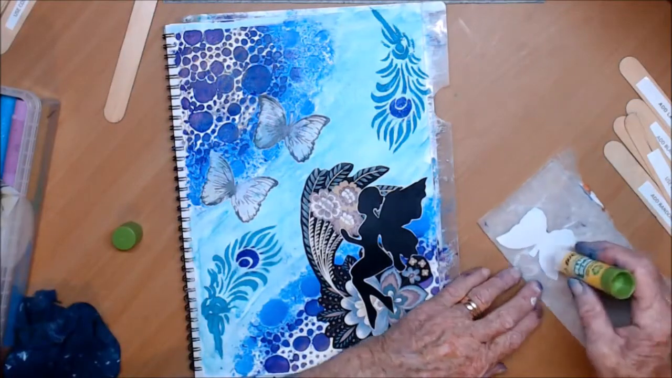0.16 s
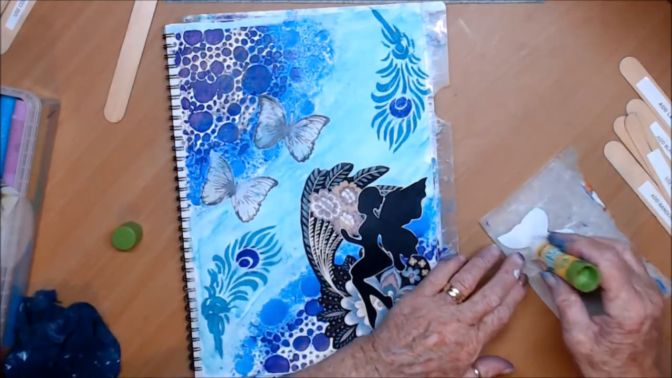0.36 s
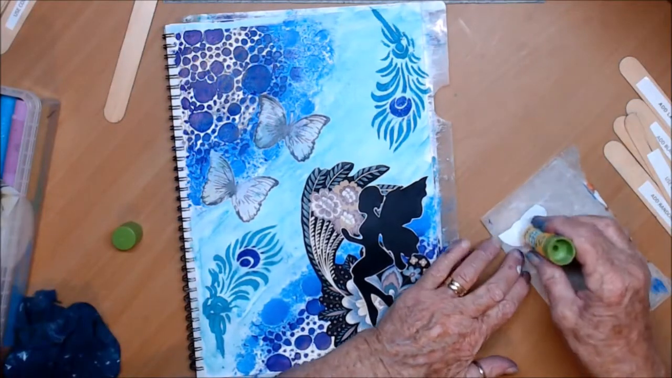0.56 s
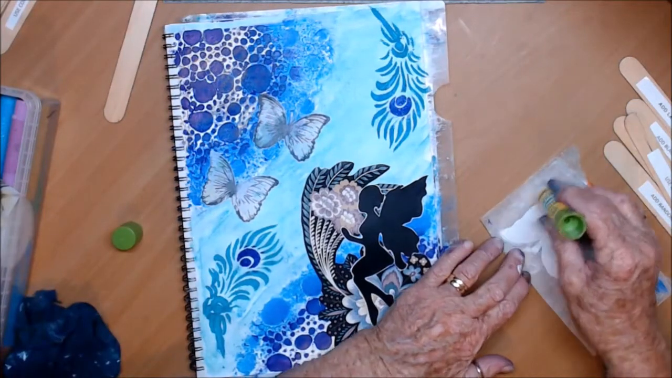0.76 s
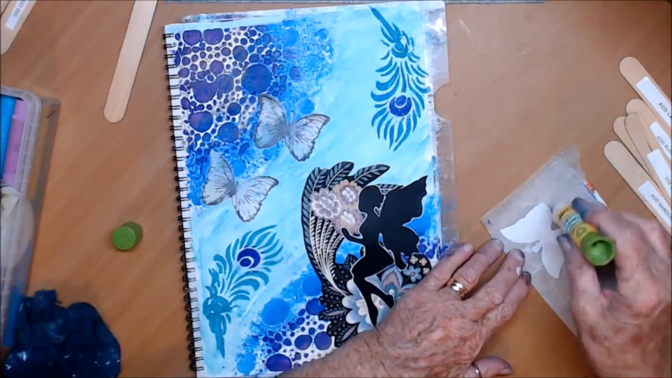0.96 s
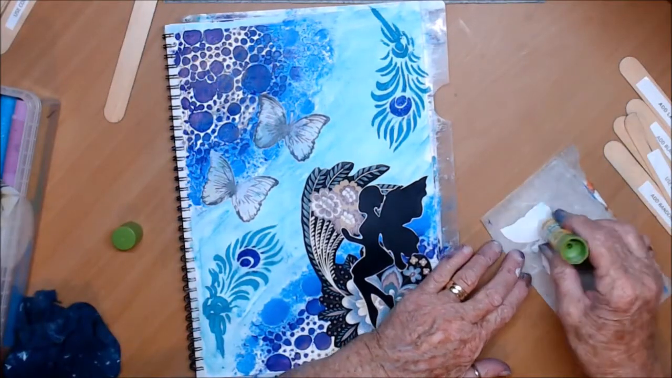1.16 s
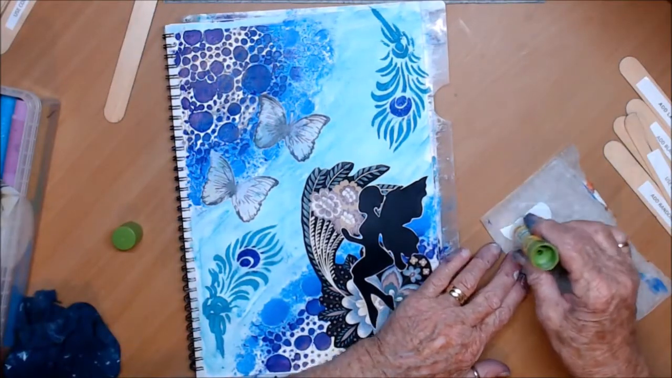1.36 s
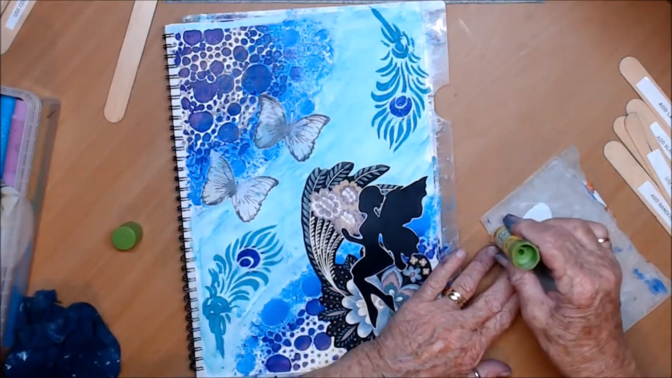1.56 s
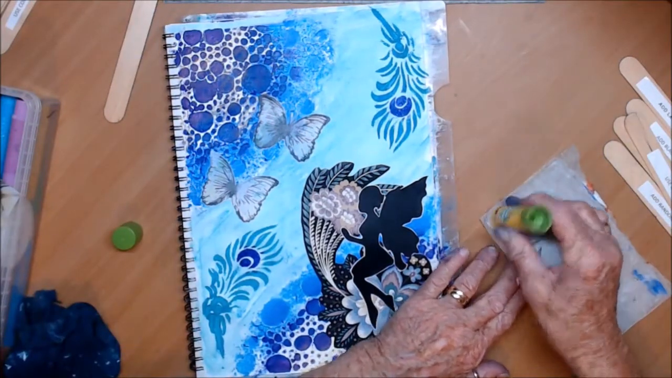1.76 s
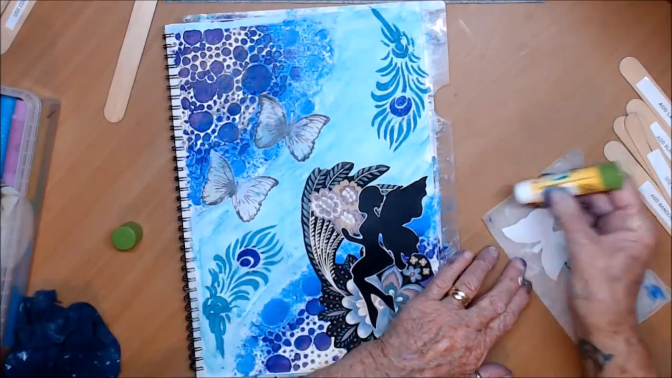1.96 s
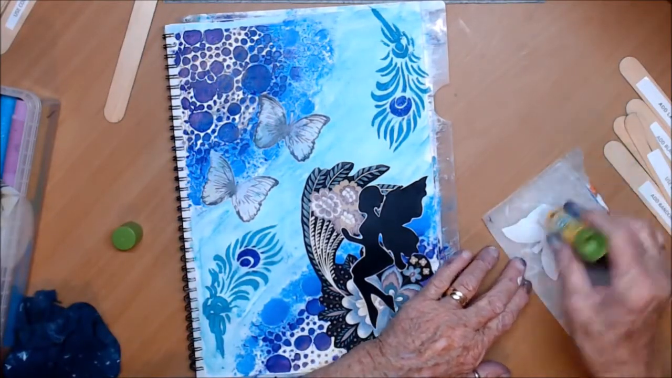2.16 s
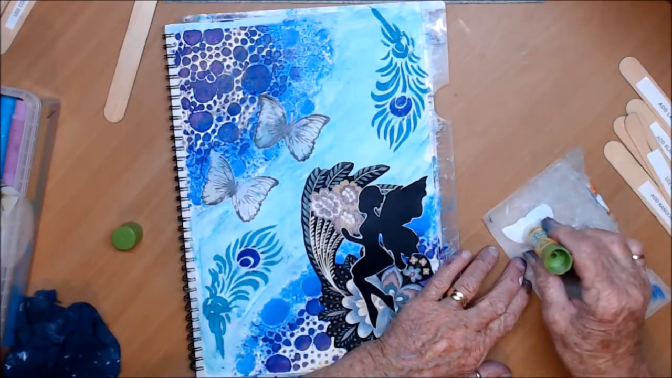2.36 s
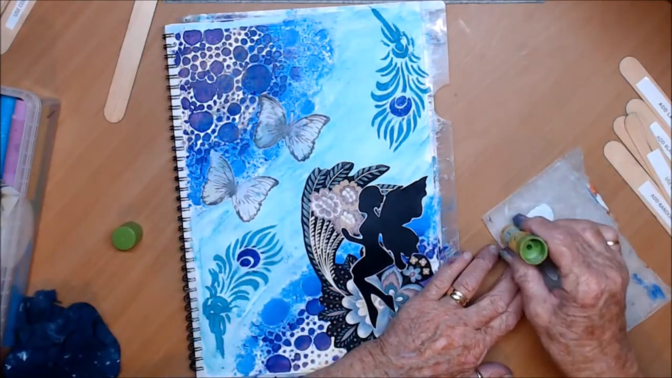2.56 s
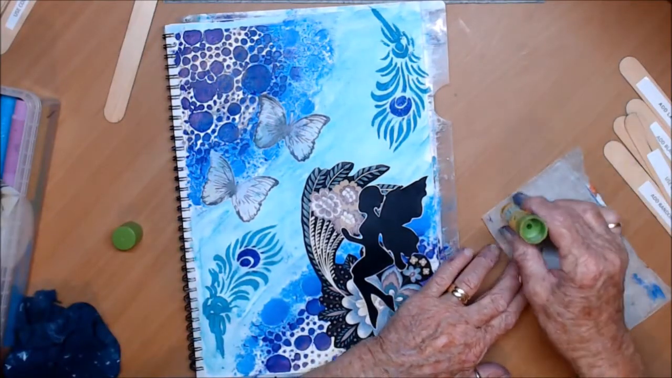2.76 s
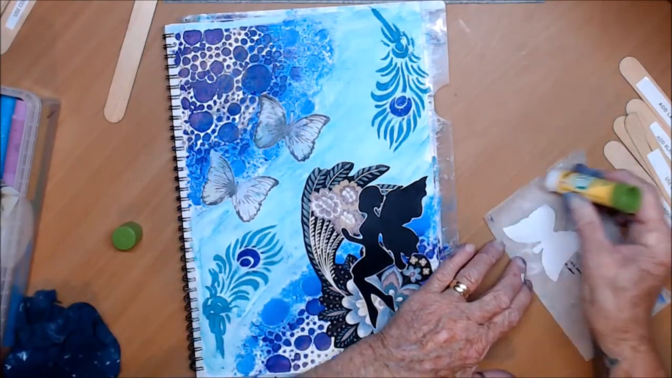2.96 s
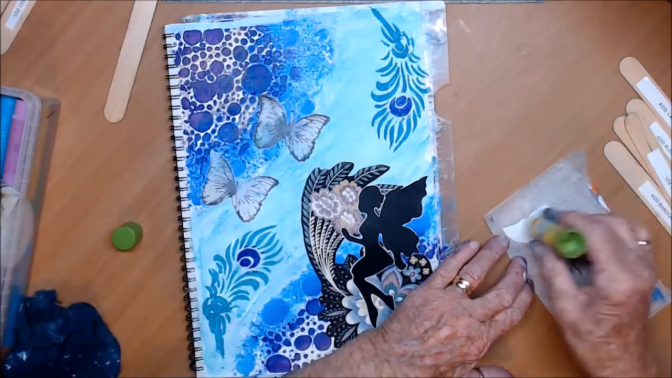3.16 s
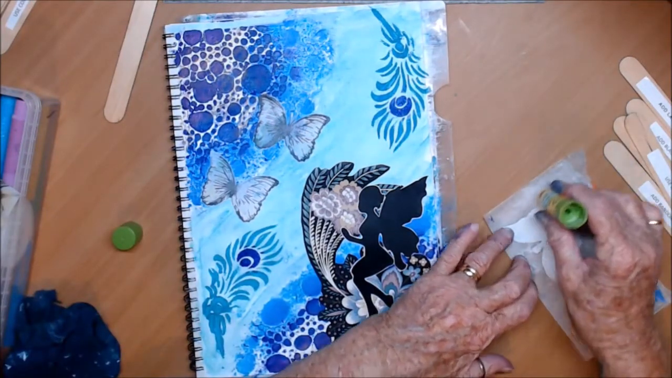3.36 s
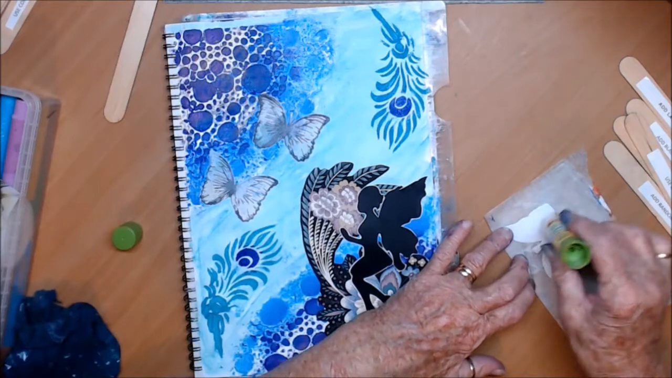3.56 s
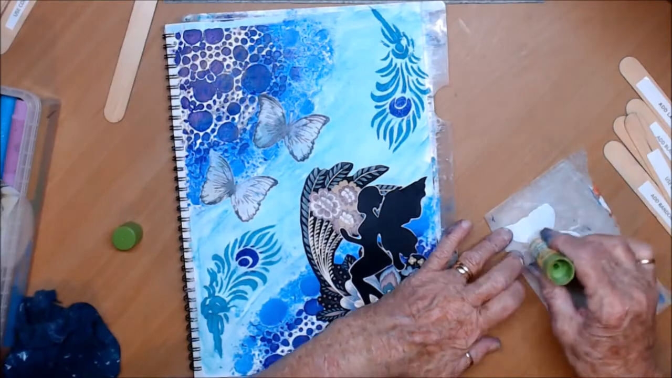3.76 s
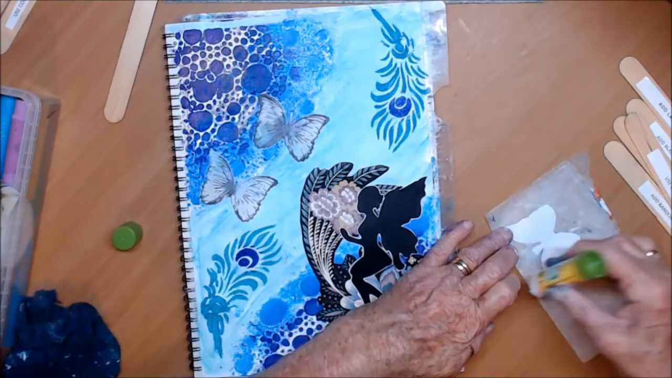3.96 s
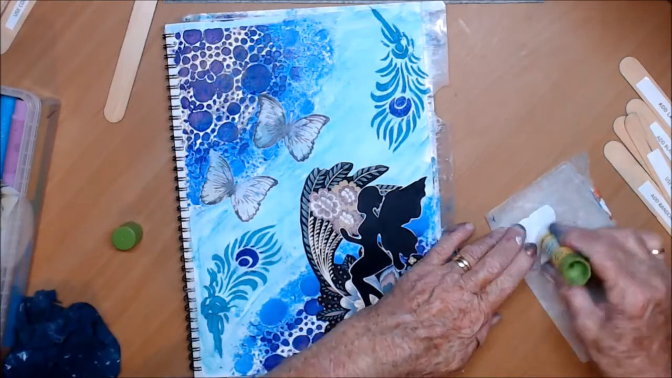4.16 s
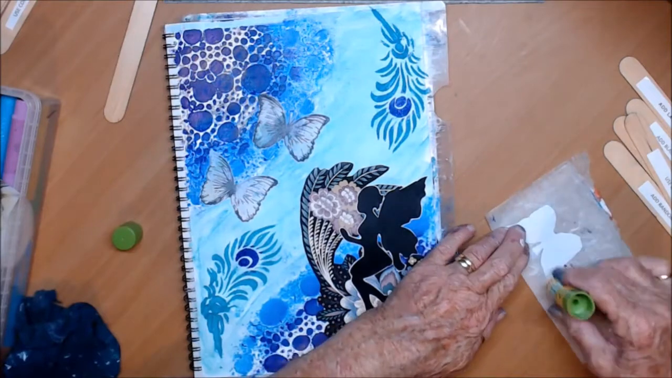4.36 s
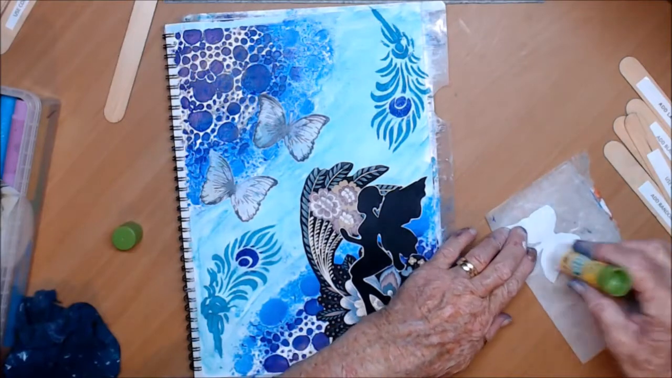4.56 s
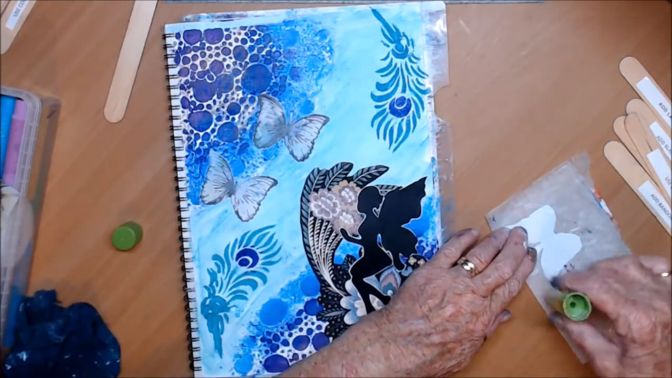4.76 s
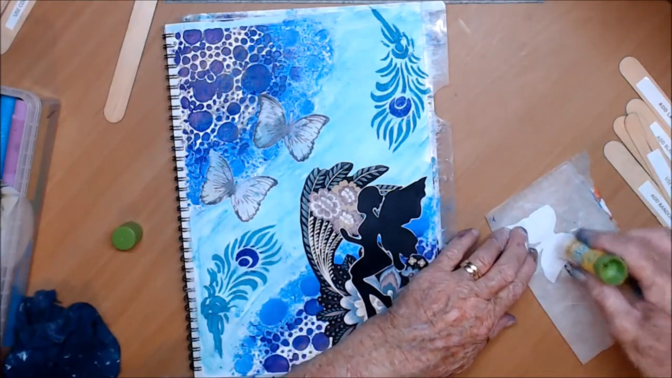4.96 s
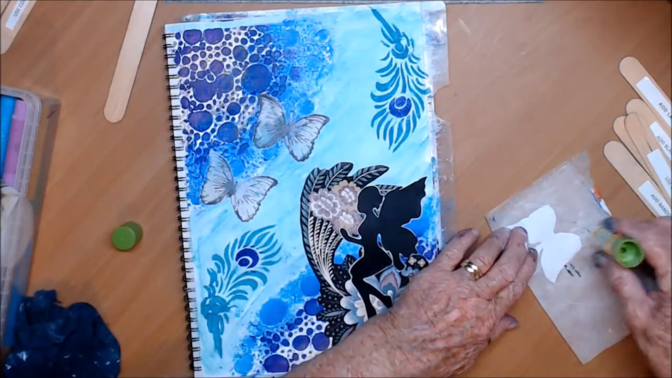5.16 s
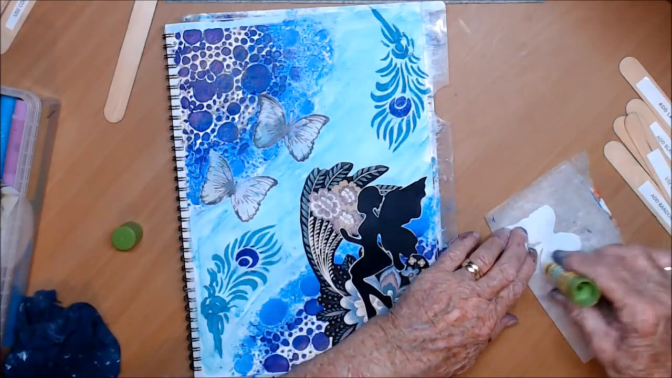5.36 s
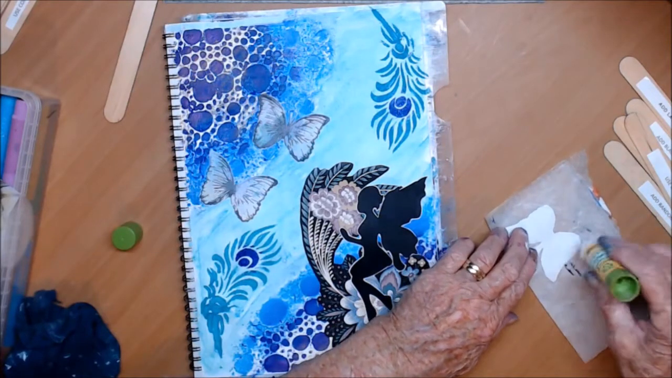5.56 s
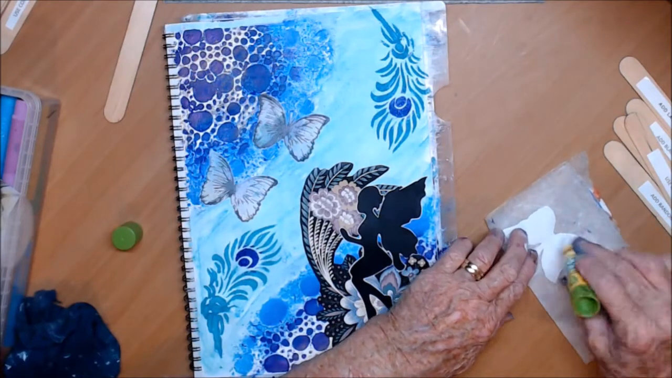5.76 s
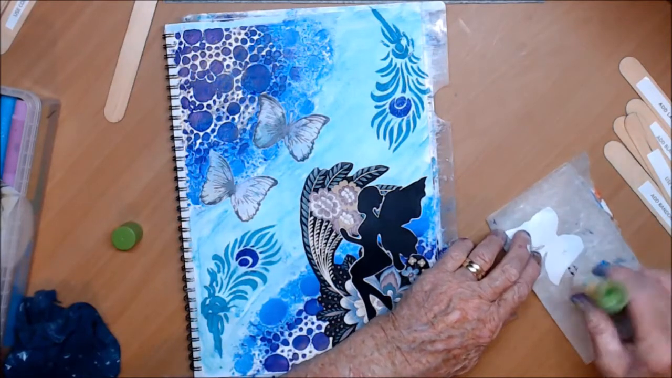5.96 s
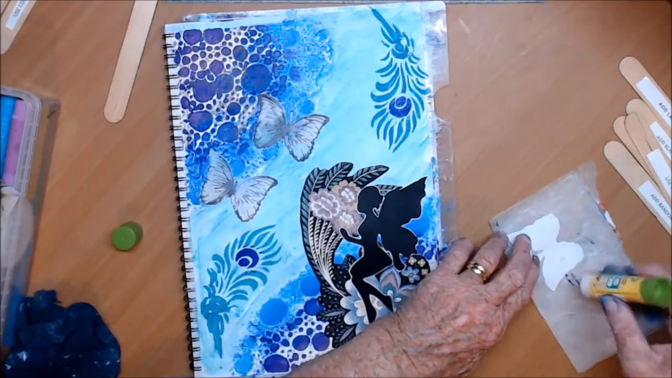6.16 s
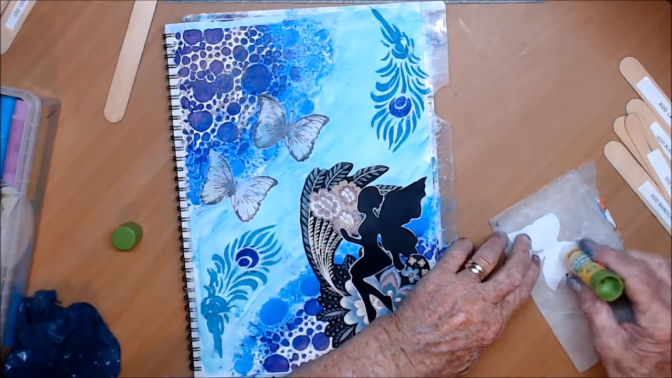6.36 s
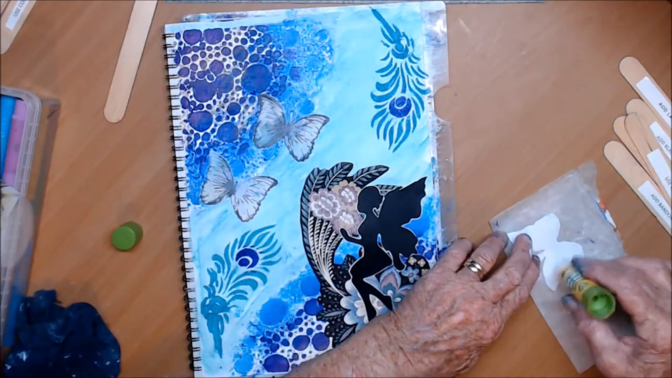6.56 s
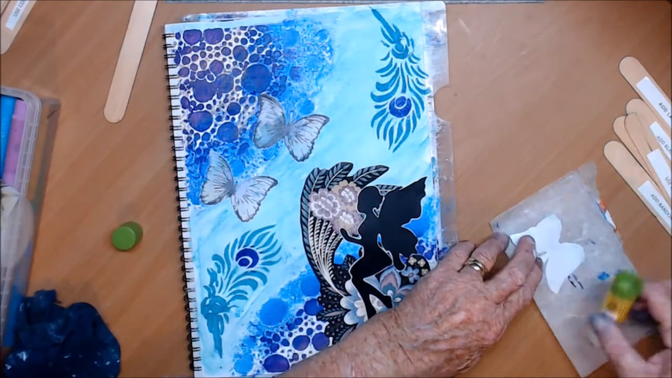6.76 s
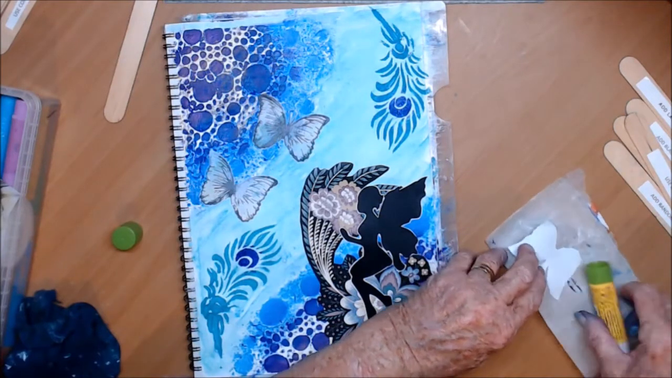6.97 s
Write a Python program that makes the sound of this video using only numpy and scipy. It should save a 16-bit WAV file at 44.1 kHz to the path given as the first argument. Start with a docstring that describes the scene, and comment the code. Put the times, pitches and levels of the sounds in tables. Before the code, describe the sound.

In a quiet room with faint hum, a clingy plastic sheet crackles and rustles at once. A glue stick then dabs the paper on it, each dab a short woody desk thump, with brief low humming drags and scrapes between. Midway the hollow tube taps once with a sharp snap. At the end the sheet rustles loudly and the stick is laid down with a knock. Close small stereo microphone.

```python
"""From start to end there is a quiet room with a faint mains hum, heard by a small stereo microphone.
At once a thin, sticky plastic sheet crackles and rustles: tiny random snaps and grains, shaped in pitch.
Soon a glue stick is dabbed and dragged over paper on it: dabs ring the wooden desk, drags hum and scrape.
The stick's hollow tube taps once midway; at the end the stick is laid down with a knock."""
import sys
import numpy as np
from scipy import signal
from scipy.fft import rfft, irfft
from scipy.io import wavfile
from scipy.ndimage import uniform_filter1d

SR = 44100
rng = np.random.default_rng(int(sys.argv[2]) if len(sys.argv) > 2 else 0)


def boost(x):
    """Linear amplitude factor 10**(x/20) for a level x in decibels (scalar or array-like)."""
    u = np.asarray(x, float) / 20
    return 10 ** u


def store_wav(level_fs):
    """Save 16-bit WAV to argv[1]."""
    pcm = np.round(np.clip(np.atleast_2d(level_fs), -1, 1) * 32767)
    wavfile.write(sys.argv[1], SR, pcm.T.astype(np.int16))


N = 309141  # samples, about 7 s
TIME = np.arange(N) / SR
HZ = np.fft.rfftfreq(N, 1 / SR) + 1  # 1 Hz up, so that its logarithm exists


def unit(x):
    """Scale to rms 1."""
    return x / np.sqrt(np.mean(x ** 2))


def shape(x, gain):
    """Multiply each frequency of a full-length sound by its gain."""
    return irfft(rfft(x) * gain, N)


def noise(gain):
    """Noise of rms 1 with the given gain per frequency."""
    return unit(shape(rng.standard_normal(N), gain))


def colour(points):
    """Gain per frequency, drawn through (f/Hz, level/dB) points."""
    hz, db = np.transpose(points)
    return boost(np.interp(np.log(HZ), np.log(hz), db))


def band(hz, lo_hz, hi_hz):
    """Steep band-pass gain."""
    low_side = 1 + (lo_hz / hz) ** 8
    high_side = 1 + (hz / hi_hz) ** 12
    return 1 / np.sqrt(low_side * high_side)


def walk(rate):
    """Smooth random wandering of rms 1: levels held for 1 / rate seconds, then averaged twice."""
    hold = int(SR / rate)
    steps = np.repeat(rng.standard_normal(N // hold + 1), hold)
    return unit(uniform_filter1d(uniform_filter1d(steps, hold), hold)[:N])


def swells(start_s, end_s, db, rise_db_per_s, fall_db_per_s):
    """One gain curve per event: climbs in dB up to its start, holds, falls away after its end."""
    for start, end, top_db, rise, fall in np.broadcast(start_s, end_s, db, rise_db_per_s, fall_db_per_s):
        before = np.maximum(start - TIME, 0)
        after = np.maximum(TIME - end, 0)
        yield boost(top_db - rise * before - fall * after)


def pushes(s, db, ms):
    """Bell-shaped contact forces; a longer contact holds less treble."""
    force = np.zeros(N)
    for at, gain, width in zip(s, boost(db), ms / 1000):
        near = slice(max(int((at - width) * SR), 0), int((at + width) * SR) + 2)
        bell = np.exp(-(np.pi * (TIME[near] - at) / width) ** 2)
        force[near] += gain * np.sqrt(np.pi) / width / SR * bell  # equal area for equal strength
    return force


def ring(force, modes):
    """A force sets off decaying tones, the natural notes (modes) of an object."""
    out = np.zeros(N)
    for hz, db, t60, sense in modes:
        pole = np.exp(2j * np.pi * hz / SR - np.log(1000) / (t60 * SR))
        out += sense * boost(db) * signal.lfilter([1], [1, -pole], force).real
    return out


def place(x, left_db, lag):
    """Stereo place: the left side gets a level difference and arrives lag samples later."""
    late = shape(x, np.exp(-2j * np.pi * HZ * lag / SR))
    return np.array([late * boost(left_db / 2), x * boost(-left_db / 2)])


def peaks(table):
    """Narrow bands of noise, heard as wavering tones."""
    return sum(boost(db) * noise(1 / (1 + ((HZ - hz) / width_hz) ** 2)) for hz, db, width_hz in table)


def drone(table):
    """Wavering bands, each with a tone near its centre that only drifts in pitch."""
    tones = np.zeros(N)
    for hz, db, width_hz in table:
        phase = 2 * np.pi * np.cumsum(hz + width_hz / 2 * walk(6)) / SR
        tones += boost(db - 2.5) * np.sin(phase)
    return .7 * peaks(table) + np.sqrt(2) * tones


# tone colour of the room air: (f/Hz, relative level/dB per Hz)
ROOM_COLOUR = [(15, -34), (25, -2), (64, -5), (113, -6.5), (156, -18.5), (205, -14), (570, -20.5),
               (787, -21.5), (976, -21), (1240, -19.5), (1590, -24.5), (2870, -24.5), (3860, -32),
               (7780, -37), (15700, -57.5)]
# wavering hum tones: (f/Hz, level/dB, half-width/Hz)
HUM_TONES = [(195, -81.5, 5), (800, -82.5, 4.3), (1230, -84.5, 42), (8000, -100, 27)]
# low rumble: (f/Hz, relative level/dB, half-width/Hz)
RUMBLE_PEAKS = [(48, -1.5, 3.2), (101, -5, 3.2)]


def room():
    """Air noise, shared by both sides in the bass and unrelated in the treble, a rumble and faint tones."""
    air_db, rumble_db = -67, -66
    fade_start_s, fade_db_per_s = 5.2, 5.5  # the rumble dies away slowly from then on
    shared = .92 / (1 + HZ / 1800)
    mid, side = noise(colour(ROOM_COLOUR)), noise(colour(ROOM_COLOUR))
    side = shape(side, np.sqrt((1 - shared) / (1 + shared)))
    air = boost(air_db + 0.26 * walk(7.2)) * (mid + side * np.array([[1], [-1]]))
    fade_db = fade_db_per_s * np.maximum(TIME - fade_start_s, 0)
    rumble = drone(RUMBLE_PEAKS) * boost(rumble_db + 1.04 * walk(4.1) - fade_db)
    return air + place(rumble + peaks(HUM_TONES), 1.2, 0.095)


def echo(x, size=12000):
    """Many blurred reflections, unrelated at the two sides, dying away together."""
    level_db, t60_s = -3, 0.13
    fade = np.exp(-np.log(1000) * TIME[:size] / t60_s)
    tail = rng.standard_normal((2, size)) * fade * (TIME[:size] > .002)
    tail *= boost(level_db) / np.sqrt(np.sum(tail ** 2, axis=1)[:, None])
    return signal.fftconvolve(x[None], tail, axes=1)[:, :N]


def sheet_colour(hz, low_db, top_db):
    """Three regions of the thin sheet: dull flap, main hiss, fine top."""
    flap = band(hz, 2000, 4300) + .08 * band(hz, 900, 2000)
    hiss = hz / 5000 * band(hz, 4100, 8300) ** 2
    return boost(low_db) * flap + hiss + boost(top_db) * band(hz, 8000, 17000)


# slides of the sheet: (peak t/s, level/dB, rise t/s, fall t/s, share below 4.3 kHz level/dB)
SLIDES = [(0.052, -62.5, 0.21, 0.013, 13.5), (0.146, -56.5, 0.036, 0.093, -1.5),
          (0.468, -69, 0.022, 0.037, 14), (0.538, -60.5, 0.23, .065, 3.5), (0.76, -71, .12, .15, -7.5),
          (1.554, -63, 0.066, .035, 1), (1.642, -66, .03, 0.27, 0), (1.908, -63.5, 0.087, 0.032, 4.5),
          (2.904, -64, 0.13, 0.014, -12.5), (3.41, -73, 0.075, .15, -2.5), (3.47, -90, 0.04, .06, -8),
          (3.69, -65.5, 0.015, .2, 0.5), (5.836, -64.5, 0.36, 0.031, -3.5), (5.994, -72, 0.18, 0.048, -6),
          (6.08, -66.5, 0.031, 0.24, 1), (6.17, -70.5, 0.2, 0.055, -4.5), (6.632, -66, 0.014, 0.2, 4),
          (6.856, -50.5, 0.073, 0.047, 0.5), (6.93, -62, 0.048, 0.41, 11), (7.01, -43.5, 0.04, .05, 6.5)]


def rustle():
    """Fine grains while the sheet slides, in uneven clusters."""
    s, db, rise_s, fall_s, low_db = np.transpose(SLIDES)
    span_db = 30  # rise and fall times cover this range

    def slide(top_db):
        """The summed loudness curves of all slides."""
        return sum(swells(s, s, top_db, span_db / rise_s, span_db / fall_s))

    clusters = boost(2.5 * walk(300) + 4.5 * rng.standard_normal(N))
    grains = unit(rng.standard_normal(N) * clusters)
    dull = shape(grains * slide(db + low_db), band(HZ, 2200, 4300))
    bright = shape(grains * slide(db), sheet_colour(HZ, -45.5, -16))
    return 0.89 * (1.7 * dull + bright)


# crackles of the sheet: (t/s, level/dB, ring f/Hz, share below 4.3 kHz level/dB)
CRACKLES = [(0.0153, -48, 3150, 4.5), (0.0341, -45.5, 2750, 3.5), (0.0456, -37, 3370, 2.5),
            (0.1432, -55, 4970, -5), (0.428, -49, 5000, 0), (0.4516, -38.5, 4720, -3),
            (0.4631, -34, 5270, -5.5), (0.6619, -52.5, 6020, -20), (0.6915, -48.5, 6000, -17.5),
            (0.7028, -45.5, 6250, -13.5), (0.7632, -38, 6070, -9.5), (0.8059, -50, 6140, -4.5),
            (0.8414, -49, 5300, -3.5), (1.4485, -62.5, 4470, -0.5), (1.4836, -58.5, 6530, -1.5),
            (1.5338, -44.5, 4500, -7), (1.55, -46.5, 5740, 1.5), (1.6411, -49.5, 7550, -13.5),
            (1.732, -61.5, 5230, 0.5), (1.833, -56.5, 5720, -5), (1.8524, -54.5, 5630, -8.5),
            (1.9033, -45.5, 6600, 0), (2.3694, -56.5, 7400, -15), (2.4897, -61.5, 4060, -2.5),
            (2.825, -62, 3460, -2), (2.861, -59, 5700, 1), (2.8776, -52.5, 5400, -0.5),
            (2.8913, -44, 5070, -4), (3.0945, -68, 3500, -1), (3.301, -63, 7140, 0),
            (3.4077, -62, 6320, -6), (3.429, -64.5, 7100, -7), (3.47, -45.5, 5730, -11),
            (3.4892, -70, 3000, 9), (3.6701, -34, 6140, 3.5), (3.7461, -56, 3500, -9.5),
            (4.2916, -54, 7240, -9), (4.7557, -53.5, 7200, 1), (5.1893, -64, 4900, -8.5),
            (5.529, -70.5, 6990, -6), (6.0766, -52, 5700, 1.5), (6.155, -51.5, 5400, -11.5),
            (6.6814, -57.5, 3730, 7), (6.841, -41.5, 4830, -13), (6.926, -52.5, 2540, 10.5),
            (6.99, -42, 4700, -16), (7.0044, -27, 2500, -5.5)]


def crackles(size=4096):
    """Glue lets go in bursts of tiny snaps that ring a patch of the sheet; each dab snaps it too."""
    rise_ms = 2.5
    t60_s, doubles_db = .021, 24  # t60 at -40 dB, doubling for each 24 dB weaker, up to four times
    slap_late_s, slap_db, slap_db_per_ms = .0015, -14.5, -14  # a longer, softer contact snaps it less
    out, t = np.zeros(N + size), TIME[:size]
    hz = np.fft.rfftfreq(size, 1 / SR) + 1
    slaps = [(s + slap_late_s, db + slap_db + slap_db_per_ms * ms, 5800, 1.5) for s, db, ms, _, _ in DABS]
    bursts = slaps + CRACKLES
    chance = rng.standard_normal((len(bursts), 2, size))
    swell = 1 - np.exp(-1000 * t / rise_ms)
    for (s, db, ring_hz, low_db), (sign, scatter) in zip(bursts, chance):
        t60 = t60_s * 2 ** min((-40 - db) / doubles_db, 2)
        snaps = sign * boost(6.14 * scatter) * swell * np.exp(-np.log(1000) * t / t60)
        snaps[0] = 6.0  # the first release is one sharp tick
        patch = 1 + 1.5 / (1 + ((hz - ring_hz) / 400) ** 2)
        lead = size // 16  # room for the filter to ring ahead of the tick
        burst = irfft(rfft(np.roll(snaps, lead)) * sheet_colour(hz, low_db, -8) * patch, size)
        at = max(int(s * SR) - lead, 0)
        out[at:at + size] += 0.78 * boost(db) * burst
    return out[:N]


# notes of the stick's hollow tube: (f/Hz, level/dB, t60 t/s, first motion +-1)
TUBE_MODES = [(724, 1, 0.016, -1), (1072, 3.5, 0.016, -1), (1378, -15.5, 0.084, 1), (2637, -3.5, 0.02, 1),
              (3200, -52, 0.022, -1)]
# knocks of the tube: (t/s, strength level/dB, contact t/ms)
KNOCKS = [(3.669, -37.5, 0.1), (6.926, -58.5, 0.17), (6.988, -45.5, 0.36), (6.991, -42.5, 0.27),
          (7.002, -26.5, 1), (7.0058, -14.5, 0.54)]


def tube_knocks():
    """Short contact forces ring the hollow tube of the stick."""
    s, db, ms = np.transpose(KNOCKS)
    return ring(pushes(s, db, ms), TUBE_MODES)


# the drag chatters on one desk note: (start t/s, length t/s, level/dB)
HUMS = [(0.355, 0.039, -65), (1.355, 0.019, -72.5), (1.53, 0.087, -69), (1.705, 0.043, -66),
        (1.857, 0.024, -74), (2.505, 0.022, -64), (2.603, 0.13, -66.5), (3.427, 0.019, -67),
        (3.535, 0.093, -74.5), (3.78, 0.017, -62.5), (3.871, 0.018, -62)]
# the drag scrapes the whole desk top: (start t/s, length t/s, level/dB)
SCRAPES = [(1.501, .4, -74), (2.45, 0.36, -79), (3.382, .12, -74), (3.71, .18, -72.5),
           (4.523, 0.091, -67.5), (4.755, 0.031, -66), (5.805, 0.041, -55), (6.842, 0.18, -70.5)]
# tone colour of the scrape: (f/Hz, relative level/dB per Hz)
SCRAPE_COLOUR = [(60, -3), (300, 5), (700, 2), (1300, -7.5), (2500, -30), (5000, -67)]


def drag():
    """Stick-slip (catching and letting go) locks onto one desk note and wavers; coarser slips scrape."""
    hum_hz, hum_waver = 357, .02  # waver as a share of the pitch
    hum_edge, scrape_edge = 598, 500  # rise and fall in dB per s
    phase = 2 * np.pi * np.cumsum(hum_hz * (1 + hum_waver * walk(60))) / SR
    s, length, db = np.transpose(HUMS)
    hum_level = sum(swells(s, s + length, db, hum_edge, hum_edge))
    hum = np.sqrt(2) * np.sin(phase) * boost(3.5 * walk(35)) * hum_level
    s, length, db = np.transpose(SCRAPES)
    grip = sum(swells(s, s + length, db, scrape_edge, scrape_edge))
    return hum + noise(colour(SCRAPE_COLOUR)) * boost(2.2 * walk(90)) * grip


# notes of the desk top: (f/Hz, level/dB, t60 t/s, first motion +-1)
DESK_MODES = [(43, -9.5, 0.082, 1), (80.6, -8, 0.15, -1), (105, -11.5, 0.12, -1), (153.7, -19, 0.17, -1),
              (183, -11, 0.089, -1), (225.3, -12.5, 0.18, -1), (275, -40, 0.27, 1), (339, -17, 0.16, -1),
              (365.2, -6.5, 0.1, 1), (428.6, -4.5, 0.1, -1), (480.4, -10.5, 0.2, -1),
              (553.5, -13.5, 0.15, -1), (557, 0, 0.085, 1), (616.5, -13.5, 0.13, -1), (649.3, -9, 0.11, -1),
              (672, -15, 0.13, -1), (778, -7.5, 0.018, 1), (812, -21.5, 0.18, -1), (913.6, -15, 0.081, -1),
              (964, -11.5, 0.027, -1), (1110, -23, 0.17, -1), (1204, -16, 0.057, -1)]
# dabs: (t/s, strength level/dB, contact t/ms, extra bass level/dB, extra upper ring level/dB)
DABS = [(0.4679, -24.5, 2.2, 0.5, 5), (0.534, -39.5, 15, 8, -3), (1.1161, -17, 0.99, -1.5, 1.5),
        (2.2422, -18.5, 1.075, -3.5, -0.5), (3.1957, -18, 0.95, -3.5, 2.5), (3.6056, -22, 1.16, 1.5, 3.5),
        (3.913, -52, 8.5, 8.5, 10.5), (4.148, -18.5, 0.65, 1, -1.5), (4.6249, -19, 1.19, -1.1, 3),
        (5.0263, -20.5, 1.3, -2.5, -1), (5.3515, -15.5, 1.37, -4.5, 2), (5.7099, -22, 1.15, 2, -2),
        (5.795, -39.5, 6.8, 6, 11), (6.168, -38.5, 3.9, -2, 25), (6.361, -26.5, 2.48, -5.5, -4),
        (6.406, -47.5, 2.9, 3.5, -8), (6.6152, -20, 1.125, -1.5, -1), (6.7, -49, 6.3, 2.5, -5),
        (6.747, -50, 6.2, 7, -1)]
# clatter too dense to list as single notes: (f/Hz, width f/Hz, level/dB, t60 t/s)
CLATTER = [(172.8, 240, -16, 0.24), (540, 190, -15.5, 0.2), (1157, 86, -20, 0.18), (2160, 350, -29.5, 0.08),
           (11500, 7000, -53, .05)]


def dabs(bass_hz=290, upper_hz=580):
    """The desk rings under each dab, each spot a little differently; shorter contact adds more clatter."""
    s, db, ms, bass_db, upper_db = np.transpose(DABS)
    spot_db = 1.7 * rng.standard_normal((len(DESK_MODES), len(DABS)))
    body, upper = np.zeros(N), np.zeros(N)
    for mode, spot in zip(DESK_MODES, spot_db):
        if mode[0] < bass_hz:
            body += ring(pushes(s, db + bass_db, ms), [mode])
        elif mode[0] < upper_hz:
            body += ring(pushes(s, db + spot, ms), [mode])
        else:
            upper += ring(pushes(s, db + upper_db + spot, ms), [mode])
    for hz, width_hz, clatter_db, t60 in CLATTER:
        extra_db = upper_db if hz > upper_hz else bass_db
        softness_db = 11.0 * ms * min(hz / 1300, 1.2)
        blows = np.zeros(N)
        blows[(s * SR).astype(int)] = boost(db + extra_db - softness_db)
        fade = signal.lfilter([1], [1, -np.exp(-np.log(1000) / (t60 * SR))], blows)
        fade = uniform_filter1d(fade, size=90, origin=44)  # climbs over 2 ms after the blow
        rattle = noise(band(HZ, hz - width_hz / 2, hz + width_hz / 2)) * boost(2.0 * walk(120))
        upper += boost(clatter_db) * fade * rattle
    return body, upper


def scene():
    """Desk sounds come through the stand, sheet and tube through the air."""
    tube = tube_knocks()
    body, upper = dabs()
    sheet = crackles() + rustle()
    desk = place(body + upper + drag(), 2.7, 1.2)
    air = place(tube, 3.7, 1.8) + place(sheet, .9, 1.92)
    reflections = echo(sheet + 0.9 * tube + 0.48 * upper + .07 * body)
    return desk + air + reflections + room()


def suppress(x, size=1024):
    """Noise suppressor: turns down every frequency that is close to its own quiet level."""
    overlap = size * 3 // 4
    spectrum = signal.stft(x, nperseg=size, noverlap=overlap)[2]
    power = np.sum(np.abs(spectrum) ** 2, axis=0)
    power = uniform_filter1d(uniform_filter1d(power, size=3, axis=0), size=3, axis=1)
    quiet = np.percentile(power, 30, axis=1, keepdims=True)
    deepest = boost(2 * -7)  # as power: at most 7 dB down
    gain = np.sqrt(np.maximum(1 - 1.146 * quiet / power, deepest))
    return signal.istft(spectrum * gain, nperseg=size, noverlap=overlap)[1][:, :N]


# mirror images around clock multiples 1-4: one ripple level/dB each
MIRROR_DB = [-34, -39, -43, -46]


def mirror(x):
    """The converter's periodic ripple puts faint images of the low mids around multiples of a clock."""
    clock_hz = 3900
    ripple = sum(boost(db) * np.cos(2 * np.pi * (k + 1) * clock_hz * TIME) for k, db in enumerate(MIRROR_DB))
    return x + ripple * shape(x, band(HZ, 300, 1500))


def low_pass(x):
    """Removes everything above the highest recorded frequency."""
    return signal.sosfilt(signal.butter(12, 15820, fs=SR, output="sos"), x)


def record(dry):
    """The recorder suppresses steady noise, mirrors the low mids faintly and cuts the very top."""
    top_cut = signal.ellip(8, .2, 60, 15800, fs=SR, output="sos")  # low-pass at 15800 Hz
    mix = signal.sosfilt(top_cut, mirror(suppress(dry)))
    return low_pass(mix)


dry = scene()
out = record(dry)
store_wav(out)
```